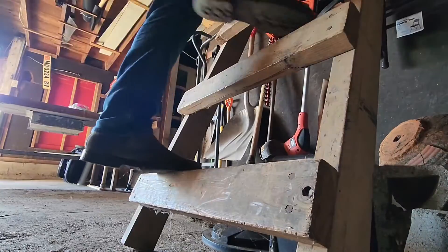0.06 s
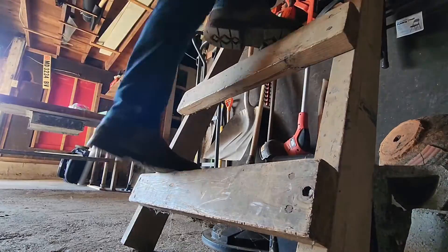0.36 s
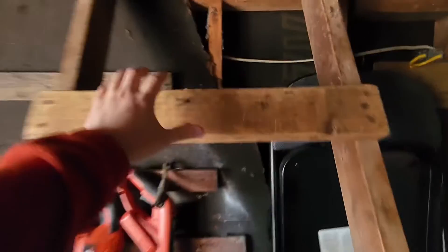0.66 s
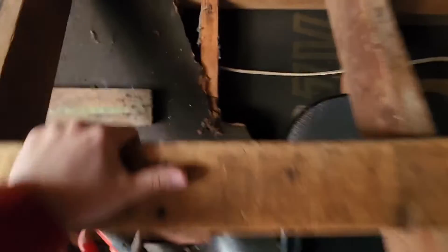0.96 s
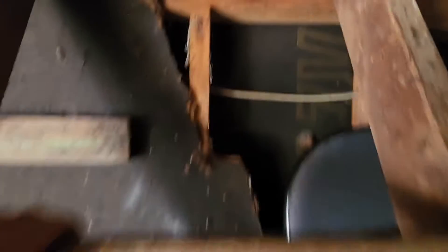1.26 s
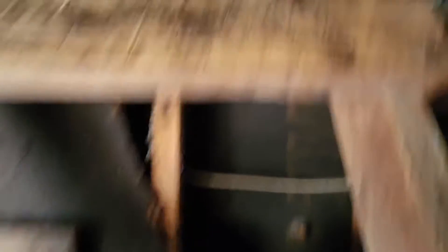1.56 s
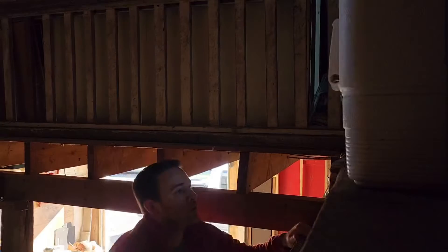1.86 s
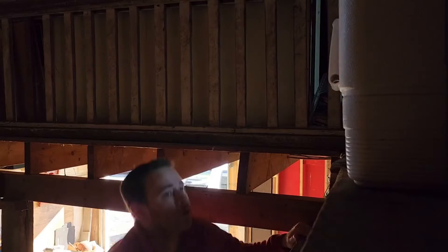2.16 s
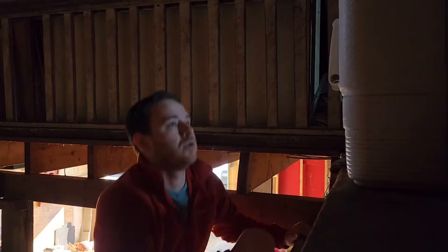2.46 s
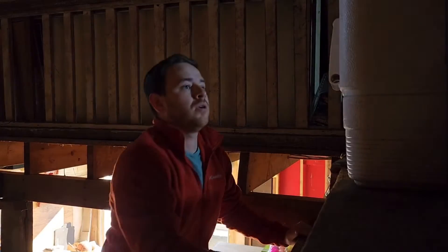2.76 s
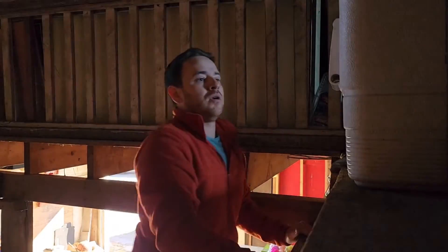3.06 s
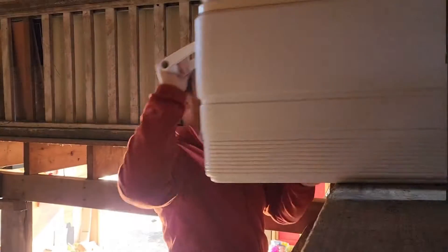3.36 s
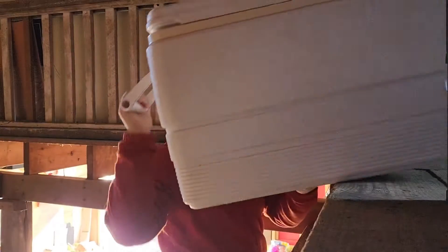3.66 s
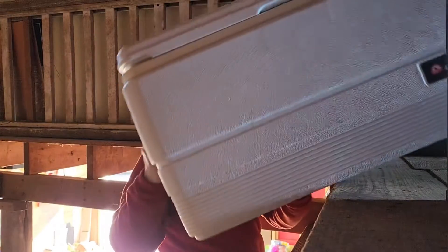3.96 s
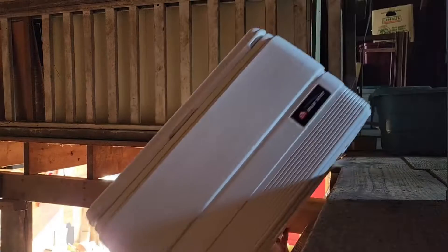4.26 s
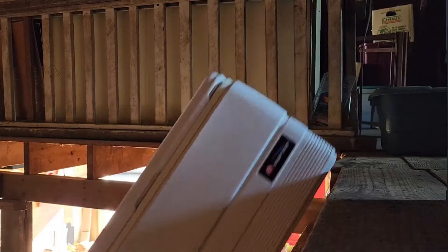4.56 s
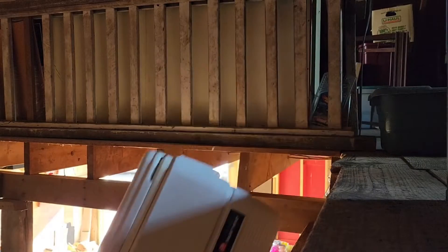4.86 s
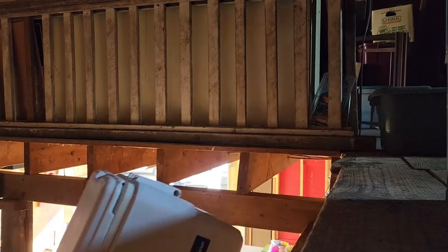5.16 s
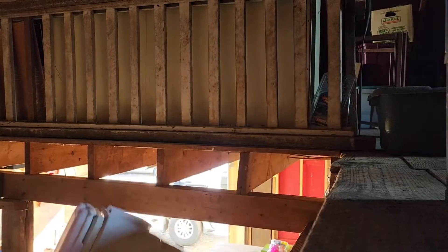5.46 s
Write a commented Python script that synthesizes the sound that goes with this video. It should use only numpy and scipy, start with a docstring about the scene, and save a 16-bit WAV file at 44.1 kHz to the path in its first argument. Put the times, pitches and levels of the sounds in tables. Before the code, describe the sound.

A low hush fills a wooden shed, with faint, thin bird whistles outside, mostly in the first half second. From the start until about 2.8 seconds, boots and hands knock unevenly on a timber ladder, each knock settling into a duller thud; the firmest come near 0.1, 0.6, 1.2 and 1.9 seconds. Clothes rustle lightly, a tiny squeak slips in at 0.7 seconds, and a hand faintly rubs the microphone between 1 and 2 seconds. At 3.1 seconds a big hollow plastic cooler is dragged over gritty planks, scraping and catching for about half a second. At 3.9 seconds it tips off the edge with a heavy, briefly ringing thump, the loudest sound. Lighter bumps, small clicks and more ladder knocks follow from 4.2 to 4.9 seconds. The cooler is set down on wood with a hollow knock at 5.2 seconds and a softer one near 5.4.

```python
"""A wooden shed with a low hush; small birds whistle thinly outside. Boots and hands knock on a timber
ladder and ring its modes, while clothes rustle and a hand faintly rubs the microphone's case. At 3.1 s a
big hollow plastic cooler is dragged over the gritty loft planks, sticking and slipping. It tips off their
edge with a heavy thump at 3.9 s, shell and air ringing, then is bumped and set down on wood amid more
ladder knocks."""
import sys
import numpy as np
from scipy import signal
from scipy.fft import rfft, irfft, next_fast_len
from scipy.io import wavfile
from scipy.ndimage import map_coordinates

SR = 44100
rng = np.random.default_rng(int(sys.argv[2]) if len(sys.argv) > 2 else 0)


def generate_wav(sig):
    """Save sig (samples, or channels by samples) to the path in sys.argv[1] as 16-bit PCM at SR."""
    pcm = np.round(np.clip(np.atleast_2d(sig).T, -1, 1) * 32767).astype(np.int16)
    wavfile.write(sys.argv[1], SR, pcm)


N = 243431


def amp(db):
    """Decibels to gain."""
    return 10 ** (np.asarray(db) / 20)


def unit(x):
    """Scale to rms 1."""
    return x / np.sqrt(np.mean(x ** 2) + 1e-20)


def along(points, hz):
    """Interpolate (f/Hz, value) points on a log axis."""
    knots_hz, values = np.transpose(points)
    return np.interp(np.log(hz + 1), np.log(knots_hz + 1), values)


def wobble(rate_hz, n=N):
    """Smooth random curve through rate_hz knots a second."""
    knots = rng.standard_normal(int(n * rate_hz / SR) + 4)
    return map_coordinates(knots, [np.arange(n) * rate_hz / SR])


def filtered(x, response):
    """Apply a frequency response."""
    n = x.shape[-1]
    padded = next_fast_len(n + 8192)
    return irfft(rfft(x, padded) * response(np.fft.rfftfreq(padded, 1 / SR)), padded)[..., :n]


def fade(t, t60_s):
    """Free decay, 60 dB in t60_s."""
    return np.exp(-np.log(1000) * t / np.maximum(t60_s, 1e-3))


def add(track, at_s, sound):
    """Mix a sound into the track."""
    start = round(at_s * SR)
    part = sound[..., max(-start, 0):N - start]
    track[:, max(start, 0):max(start, 0) + part.shape[-1]] += part


def strokes(rows, attack_s, t60_s):
    """Envelope of (t/s, length/s, level/dB) strokes that rise, hold and decay."""
    t = np.arange(N) / SR
    return sum(amp(db) * np.clip((t - at_s) / attack_s, 0, 1)
               * fade(np.maximum(t - at_s - length_s, 0), t60_s) for at_s, length_s, db in rows)


def spread(pair, colour):
    """Two independent signals to coloured stereo of rms 1: bass alike, treble unrelated."""
    # left-right likeness: f/Hz, coherence
    coherence = [(100, 0.98), (200, 0.92), (400, 0.64), (1000, 0.32), (2500, 0.067), (8000, 0.027)]

    def response(hz):
        angle = np.arccos(np.clip(along(coherence, hz), 0, 1)) / 2
        return colour(hz) * np.array([np.cos(angle), np.sin(angle)])
    mid, side = filtered(pair, response)
    return unit(np.array([mid + side, mid - side]))


def rush(spectrum, grain_db=0, grain_hz=500):
    """Coloured stereo noise; grain_db makes its level flicker."""
    pair = rng.standard_normal((2, N)) * amp(grain_db * wobble(grain_hz))
    return spread(pair, lambda hz: amp(along(spectrum, hz)))


def crowd(low_hz, high_hz, db_per_oct, n):
    """Many overlapping modes as a sloped noise band."""
    def colour(hz):
        skirts = np.sqrt((1 + (low_hz / (hz + 1)) ** 6) * (1 + (hz / high_hz) ** 8))
        return amp(db_per_oct * np.log2(hz / low_hz + .1)) / skirts
    return spread(rng.standard_normal((2, n)), colour)


def ring(modes, t, scatter_db):
    """Damped modes of alternating sign; close neighbours swell and beat."""
    hz, db, t60_s = np.transpose(modes)[:, :, None]
    sign = (-1) ** np.arange(len(hz))[:, None]
    gain = sign * amp(db + scatter_db * rng.standard_normal(hz.shape))
    return np.sum(gain * np.sin(2 * np.pi * hz * t) * fade(t, t60_s), axis=0)


def blows(contacts, modes, scatter_db, crack_db, crack_t60_s):
    """Each contact rings the main modes and stirs the crowded ones; hard ones start with a crack."""
    # thud, knock, clack and tick bands: low/Hz, high/Hz, slope/(dB/oct), t60 factor, trim/dB
    bands = [(46.6, 178, 3, 0.88, 0.5), (161, 540, -6.5, 1.2, -4), (580, 2500, -9, 0.95, 0),
             (2730, 23000, -10.5, 1.12, 1.5)]
    out, t = np.zeros((2, N)), np.arange(SR // 3) / SR
    clatters = [crowd(*band[:3], 2 * SR) for band in bands]
    for at_s, db, thud_db, clack_db, tick_db, t60_s, rise_s, ring_db in contacts:
        force = [(90, thud_db), (250, 0), (1100, clack_db), (5000, tick_db)]  # f/Hz, level/dB
        driven = [(hz, mode_db + along(force, hz), life_s) for hz, mode_db, life_s in modes]
        sound = amp(ring_db) * ring(driven, t, scatter_db)
        crack = 1 + amp(crack_db + min(clack_db, 0) / 2) * fade(t, crack_t60_s)
        start = rng.integers(2 * SR - len(t))
        for (_, band_db), clatter, (low_hz, _, _, t60_factor, trim_db) in zip(force, clatters, bands):
            swell = 1 - np.exp(-t * low_hz / .24)  # modes need part of a cycle to build
            envelope = amp(band_db + trim_db) * fade(t, t60_s * t60_factor) * crack * swell
            sound = sound + unit(clatter[:, start:start + len(t)]) * envelope
        attack = 1 - np.exp(-t / max(rise_s, 1e-4))
        add(out, at_s - rise_s, amp(db) * sound * attack)
    return out


def hush(shake, rumble_db=-58.5, sway_db=-12, lag_s=.1, air_db=-70.5):
    """Faint, even air over a low rumble that swells while the timber is shaken."""
    # rumble spectrum: f/Hz, rel. level/dB
    lows = [(12, -32.5), (20, -5.5), (65, -3.5), (81, -5.5), (112, -3.5), (125, -7), (200, -21.5),
            (260, -65), (440, -120)]
    # air spectrum: f/Hz, rel. level/dB
    air = [(120, -33), (200, 3.5), (1080, -11), (2130, -13), (2470, -19), (2860, -18), (3900, -17.5),
           (7140, -22.5), (9060, -32.5), (16000, -34.5)]
    pole = np.exp(-1 / (lag_s * SR))
    power = signal.lfilter([1 - pole], [1, -pole], np.mean(shake ** 2, axis=0))
    rumble_gain = np.hypot(amp(rumble_db), amp(sway_db) * np.sqrt(power))
    return rumble_gain * rush(lows) + amp(air_db) * rush(air)


def shed(x, build_s=.0089):
    """The timber walls reverberate; treble dies first."""
    # room decay: f/Hz, t60/s
    decay = [(100, 0.67), (400, 0.63), (2000, 0.56), (6000, 0.52), (14000, 0.33)]
    noise = spread(rng.standard_normal((2, SR)), np.ones_like)
    hz, t, bins = signal.stft(noise, SR, nperseg=256)
    bins = bins * fade(t, along(decay, hz)[:, None]) * (1 - np.exp(-t / build_s))
    _, tail = signal.istft(bins, SR, nperseg=256)
    return signal.fftconvolve(x, tail / np.linalg.norm(tail[0]), axes=1)[:, :N]


def sympathy(x, low_hz, high_hz, t60_s, count):
    """Boards or stored gear pick up the shaking and ring at scattered pitches."""
    t = np.arange(SR // 2) / SR
    place, left, right = rng.random((count, 3)).T[:, :, None]
    hz = low_hz * (high_hz / low_hz) ** ((np.arange(count)[:, None] + place) / count)
    tails = np.array([np.sum(np.sin(2 * np.pi * (hz * t + phase)), axis=0) for phase in (left, right)])
    tails = tails * fade(t, t60_s) * (1 - np.exp(-t / .002))
    return signal.fftconvolve(x, tails / np.linalg.norm(tails, axis=1, keepdims=True), axes=1)[:, :N]


def birds(waver_hz=40, waver_per_glide=.21):
    """Thin gliding whistles; wide glides waver most."""
    # whistles: t/s, length/s, start/Hz, end/Hz, level/dB
    calls = [(-.03, 0.094, 7790, 7000, -60), (.34, 0.12, 7750, 7400, -67), (0.439, 0.12, 7250, 7850, -64.5),
             (1.935, 0.054, 7600, 7580, -76), (2.055, .04, 5200, 5300, -76), (2.385, .035, 5200, 5250, -85),
             (2.406, 0.077, 7160, 7200, -84), (2.42, .07, 2950, 2950, -84), (2.73, 0.072, 5070, 5900, -82),
             (2.76, .12, 4390, 4300, -84), (3.745, 0.16, 7000, 5700, -70)]
    out = np.zeros((2, N))
    for at_s, length_s, start_hz, end_hz, db in calls:
        progress = np.linspace(0, 1, round(length_s * SR))
        glide_hz = end_hz - start_hz
        depth_hz = waver_hz + waver_per_glide * abs(glide_hz)
        hz = start_hz + glide_hz * progress + depth_hz * wobble(700, len(progress))
        envelope = amp(db) * np.sqrt(np.abs(np.sin(np.pi * progress)))
        add(out, at_s, envelope * np.sin(2 * np.pi * np.cumsum(hz) / SR))
    return out


def clothes():
    """Sleeves and trousers brush cloth and timber during the climb."""
    # brushes: t/s, length/s, rel. level/dB
    brushes = [(0, 1.14, -77.5), (.12, 0.12, -73), (.33, .06, -73), (.57, 0.13, -77), (.712, 0.093, -58.5),
               (1.21, 0.085, -72.5), (1.315, 0.032, -67.5), (1.4, 0.37, -84), (2.08, .09, -79)]
    # rustle spectrum: f/Hz, rel. level/dB
    cloth = [(410, -35), (700, -6), (934, -5.5), (1040, -8), (1620, -16.5), (2880, -11.5), (8310, -18),
             (10100, -19), (16000, -22)]
    envelope = amp(8) * strokes(brushes, attack_s=.0097, t60_s=.13)
    return envelope * rush(cloth, grain_db=1.5, grain_hz=120)


def handling():
    """Faint, hollow rubbing of a hand on the microphone's case."""
    # rubs on the case: t/s, length/s, rel. level/dB
    rubs = [(.98, 0.16, -72), (1.195, .01, -58), (1.27, 0.058, -54), (1.31, .04, -53), (1.432, .01, -53.5),
            (1.47, 0.031, -65), (1.67, .07, -70), (1.745, .07, -62), (2.09, 0.1, -69)]
    # rub resonances: f/Hz, width/Hz, rel. level/dB
    peaks = [(370, 83, 3.5), (1300, 120, 4), (2050, 110, -17), (2980, 160, -12), (3240, 140, -8),
             (4400, 190, -16)]

    def body(hz):
        return sum(amp(db) * 1j * hz * width_hz / (peak_hz ** 2 - hz ** 2 + 1j * hz * width_hz)
                   for peak_hz, width_hz, db in peaks)
    friction = rng.standard_normal((2, N)) * amp(3 * wobble(120))
    return amp(1) * strokes(rubs, attack_s=.0085, t60_s=.14) * spread(friction, body)


def squeaks():
    """Rubber and skin slip briefly on wood, gliding in pitch."""
    # slips: t/s, length/s, start/Hz, end/Hz, level/dB
    slips = [(.671, 0.0049, 2680, 1830, -40.5), (0.673, 0.004, 1740, 715, -42),
             (1.005, 0.009, 1820, 2270, -51)]
    out = np.zeros((2, N))
    for at_s, length_s, start_hz, end_hz, db in slips:
        hz = np.geomspace(start_hz, end_hz, round(length_s * SR))
        add(out, at_s, amp(db) * np.hanning(len(hz)) * np.sin(2 * np.pi * np.cumsum(hz) / SR))
    return out


def clicks():
    """Small, dry, hard contacts of the gear and its handles."""
    # clicks: t/s, level/dB, t60/s
    contacts = [(0.571, -38.5, 0.0035), (1.098, -53.5, 0.0052), (4.2219, -41, 0.0032), (4.869, -52.5, 0.01),
                (4.945, -69, 0.25)]
    out, t = np.zeros((2, N)), np.arange(SR // 5) / SR
    for at_s, db, t60_s in contacts:
        add(out, at_s, amp(db) * crowd(610, 16000, -1.8, len(t)) * fade(t, t60_s))
    return out


def ladder(rise_s=.0016, ring_db=-3.5, tick_re_clack_db=-20.5, settle_s=.045, settle_t60_s=.24):
    """Boots and hands knock the timber, then the weight settles with a duller thud."""
    # landings: t/s, rel. knock level/dB, then re knock: thud/dB, clack/dB, settling/dB
    landings = [(0.124, -27, 2.5, 0, -20), (0.387, -51.5, 11, -17, -25), (0.573, -25, 1, -25, -8),
                (0.724, -32, 2, -6.5, -7), (0.817, -39.5, 7, -26, -13), (0.948, -45, -10, -20, -9),
                (1.037, -48, -17, -9, -11), (1.211, -28.5, -18, -5.5, -7.5), (1.357, -43, 10, -12, -8),
                (1.882, -47, 4, -12, -8), (1.918, -30, 0, -19, -7), (2.025, -48, 4, -22, -18),
                (2.695, -54.5, 4.5, -35, -18), (2.791, -35, -2, -16, -10), (4.224, -36, 0, -8, -8),
                (4.451, -46, 2, -31, -22), (4.561, -38.5, 4, -9, -4), (4.64, -39, -2.5, -34, -6),
                (4.698, -33, 0, -12, -3)]
    # timber modes: f/Hz, rel. level/dB, t60/s
    modes = [(96, 0.5, 0.32), (140.6, -2, 0.41), (193.4, -7.5, 0.46), (252.9, -4.5, 0.21),
             (313.6, -7.5, 0.54), (359.6, -7, 0.29), (516, -21.5, 0.054), (576, -10.5, 0.34),
             (747, -13.5, 0.24), (897, -4, 0.097), (1059, -5.5, 0.15), (1163, -2.5, 0.061),
             (1534, -7, 0.14), (2100, -14, .15), (2870, -4, 0.14)]
    contacts = []
    for at_s, db, thud_db, clack_db, settle_db in landings:
        t60_s = .16 - .003 * clack_db  # soft contacts linger
        dull_db = clack_db - 9
        contacts.append((at_s, db, thud_db, clack_db,
                         clack_db + tick_re_clack_db, t60_s, rise_s, ring_db))
        contacts.append((at_s + settle_s, db + settle_db, thud_db + 4, dull_db,
                         dull_db + tick_re_clack_db, settle_t60_s, rise_s, ring_db))
    return blows(contacts, modes, scatter_db=2, crack_db=12, crack_t60_s=.017)


def drag(lift_s=3.605):
    """Stick and slip shake the cooler and planks; grit crunches until the shell tips and lifts off."""
    # pulls, each coasting to rest: t/s, length/s, rel. level/dB
    pulls = [(3.125, 0.16, 0.5), (3.77, 0.18, -28)]
    # judder spectrum: f/Hz, rel. level/dB
    judder = [(29, -41), (50, -17), (75, -15.5), (112, 5.5), (178, 0.5), (285, 1.5), (377, -7), (415, 0.5),
              (510, -18.5), (555, -4), (649, -15.5), (760, -13.5), (900, -12.5), (1170, -48), (1980, -120)]
    # rasp spectrum: f/Hz, rel. level/dB
    rasp = [(350, -30), (600, -4.5), (651, -3), (765, -2.5), (955, -1.5), (1070, -5.5), (1430, -3.5),
            (1880, -7), (2320, -9.5), (2530, -18.5), (3500, -18.5), (4550, -50), (7700, -120)]
    # grit spectrum: f/Hz, rel. level/dB
    grit = [(1650, -25.5), (2800, 0), (3750, -3), (4270, 3.5), (5810, -4), (6520, -0.5), (7940, -7.5),
            (8610, -4.5), (13300, -12.5), (15300, -20)]
    # shell catching on grit: t/s, knock/dB, snap/dB
    catches = [(3.128, -51, -41), (3.144, -27.5, -34.5), (3.171, -30, -44), (3.208, -25, -30.5),
               (3.223, -29, -40.5), (3.262, -35, -39.5), (3.285, -24, -50), (3.364, -40, -52)]
    on_grit = fade(np.maximum(np.arange(N) / SR - lift_s, 0), .7)
    out = amp(-29) * strokes(pulls, attack_s=.027, t60_s=.83) * rush(judder, grain_db=3.5, grain_hz=170)
    out += amp(-37) * strokes(pulls, attack_s=.006, t60_s=1.13) * rush(rasp, grain_db=1.5, grain_hz=440)
    crunch_gain = amp(-42.5) * on_grit * strokes(pulls, attack_s=.0032, t60_s=.99)
    out += crunch_gain * rush(grit, grain_db=1.5, grain_hz=1400)
    t = np.arange(SR // 4) / SR
    for at_s, knock_db, snap_db in catches:
        add(out, at_s, amp(knock_db) * crowd(130, 1000, -2.3, len(t)) * fade(t, .1))
        add(out, at_s, amp(snap_db) * crowd(1900, 16000, -2.8, len(t)) * fade(t, .056))
    return out


def bumps(thud_db=-15, t60_s=.19):
    """The hollow cooler strikes the loft edge and ladder; its two close lowest modes throb."""
    # strikes: t/s, knock/dB, clack/dB re knock, ring/dB re knock, rise/s
    strikes = [(3.636, -39, -20, -2, 0.0086), (3.779, -51, -24, 2.5, 0.0086),
               (3.8912, -20.5, -2.5, 3, .0005), (3.901, -21, -9, -19, .0007), (4.263, -42, -1.5, 2, .007),
               (4.553, -54, 11, -1, 0.0054), (4.560, -49.5, 12, 4.5, .0023), (5.087, -50.5, -16, -6, .0055),
               (5.166, -54.5, 7.5, 0, 0.0074), (5.173, -29, -11, -2, .002), (5.449, -35, -16, -12, 0.0022)]
    # shell and air modes: f/Hz, rel. level/dB, t60/s
    modes = [(194, 3.5, .31), (211, 4.5, .32), (297, -11, .2), (330, -7, .25), (377, -8, .25),
             (457, -11, .2), (549, -14, .18), (660, -12, .18), (1050, -15, .13), (1355, -12, .15),
             (1463, -8, .15), (1750, -10, .16), (2051, -13, .14), (2229, -13, .14), (2453, -11, .15),
             (3200, -11, .16), (4410, -10, .11), (4950, -13, .1)]
    contacts = []
    for at_s, db, clack_db, ring_db, rise_s in strikes:
        tick_db = -9 + 1.615 * clack_db  # harder blows on plastic gain treble fastest
        contacts.append((at_s, db, thud_db, clack_db, tick_db, t60_s, rise_s, ring_db))
    return blows(contacts, modes, scatter_db=3.5, crack_db=6.5, crack_t60_s=.013)


def cooler_path(hz):
    """Response from the cooler to the left and right side."""
    # sound path: f/Hz, colour/dB, left minus right/dB, left lead/rad
    path = [(80, -2.5, -0.5, 0.021), (198, 0, -2.5, 0.17), (374, 2.5, -5.5, 0.37),
            (1000, -4.5, -2.5, 0.097), (1700, 0, 0, .8), (2600, -1.5, 1.5, 1.17), (4950, -1, -1.5, 1.4),
            (8700, -2, -1.5, 0.42), (12800, 2, 2.5, 0.82)]
    colour_db, balance_db, lead_rad = (along(np.array(path)[:, [0, k]], hz) for k in (1, 2, 3))
    side = np.array([[.5], [-.5]])
    return amp(colour_db + side * balance_db) * np.exp(1j * side * lead_rad)


def scene():
    """The climb, the cooler and the birds over the hush of the shed."""
    climb = amp(-5) * ladder() + squeaks() + clothes() + handling()
    slide = drag()
    cooler = filtered(bumps() + slide, cooler_path)
    whistles = birds()
    boards = amp(-15.5) * sympathy(climb + cooler, low_hz=699.3, high_hz=9045, t60_s=.13, count=50)
    gear = amp(-29.5) * sympathy(cooler, low_hz=900, high_hz=6000, t60_s=.74, count=70)
    room = shed(amp(-15) * climb + amp(-19.5) * cooler + amp(3) * whistles)
    shake = amp(5) * climb + amp(-8) * slide
    return climb + cooler + clicks() + whistles + boards + gear + room + hush(shake)


def record(dry, top_hz=15850, edge_hz=400):
    """Steep low-pass."""
    return filtered(dry, lambda hz: np.clip((top_hz - hz) / edge_hz + .5, 0, 1))


dry = scene()
out = record(dry)
generate_wav(out)
```